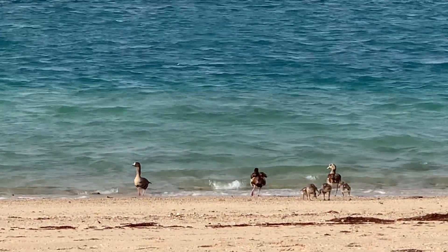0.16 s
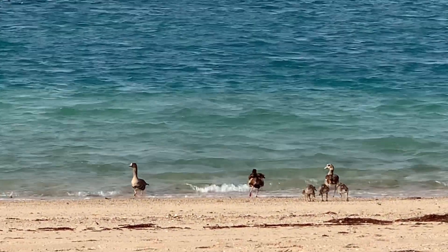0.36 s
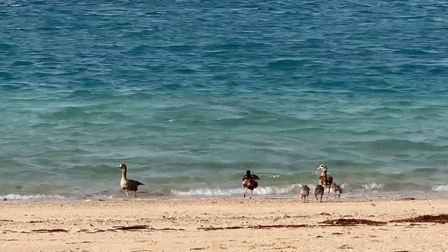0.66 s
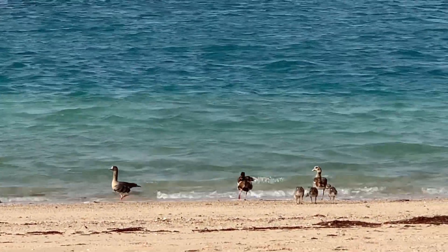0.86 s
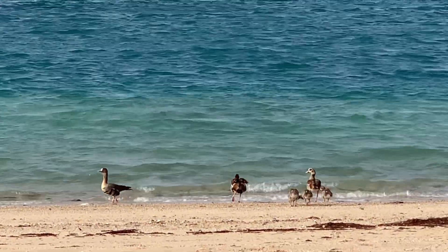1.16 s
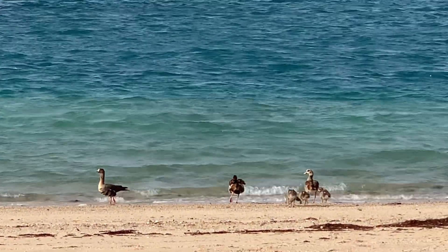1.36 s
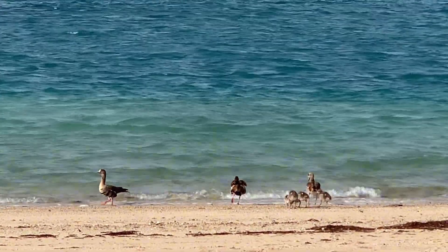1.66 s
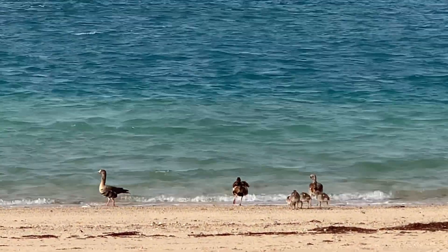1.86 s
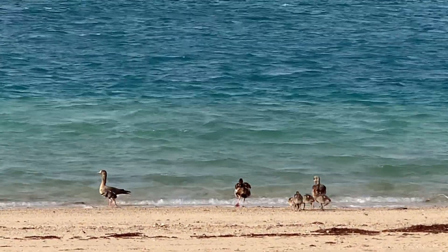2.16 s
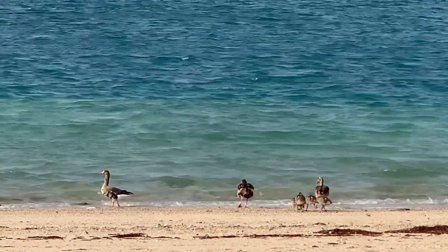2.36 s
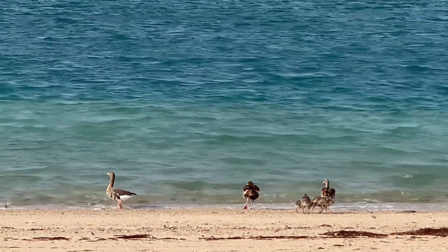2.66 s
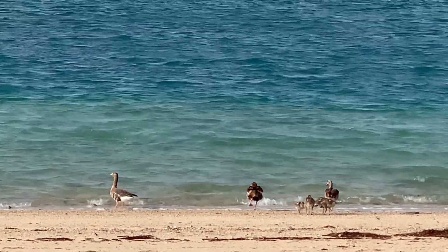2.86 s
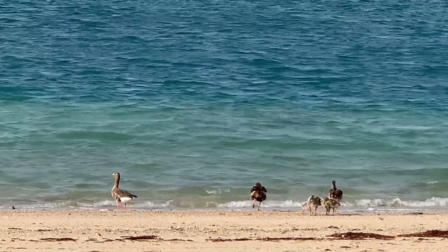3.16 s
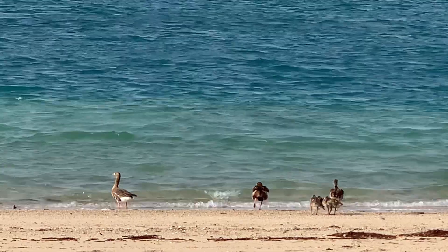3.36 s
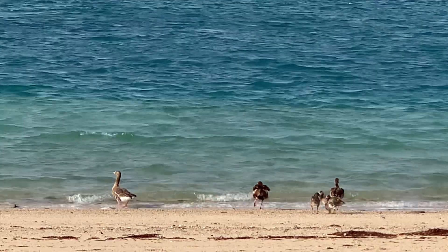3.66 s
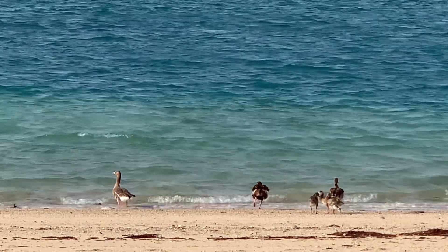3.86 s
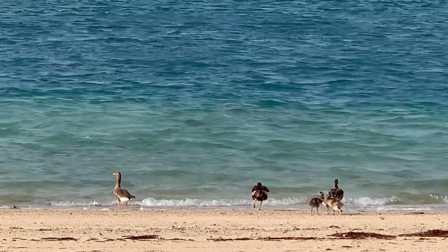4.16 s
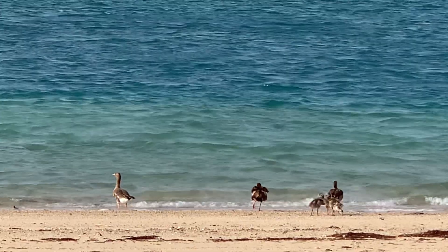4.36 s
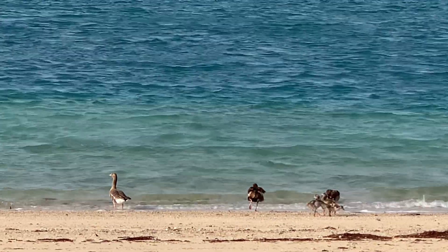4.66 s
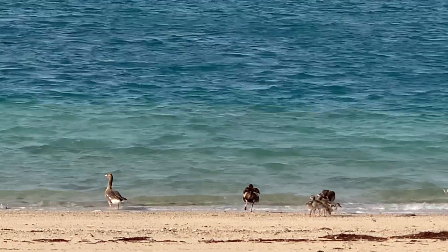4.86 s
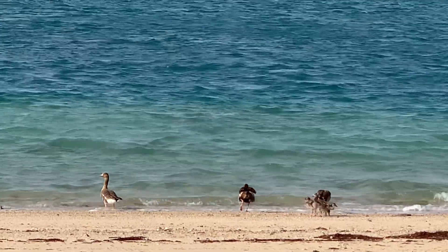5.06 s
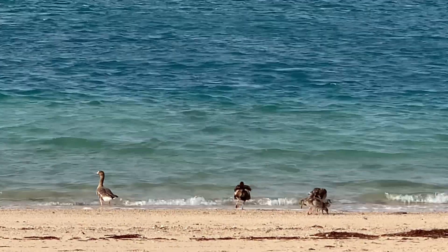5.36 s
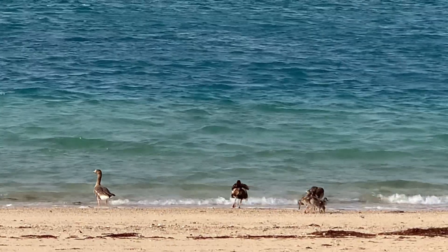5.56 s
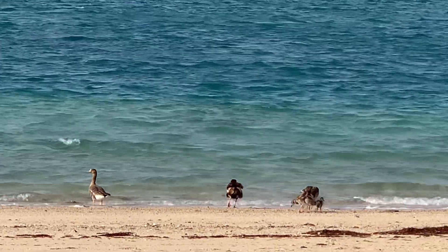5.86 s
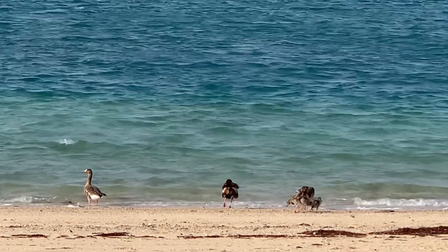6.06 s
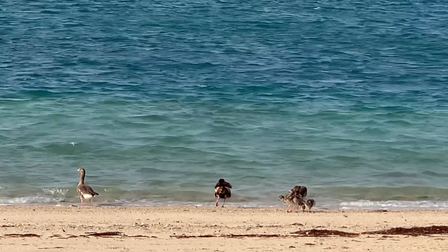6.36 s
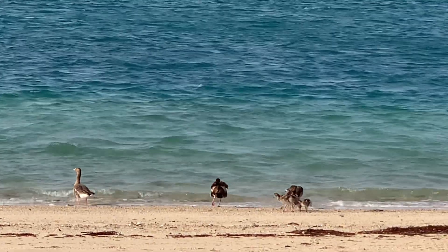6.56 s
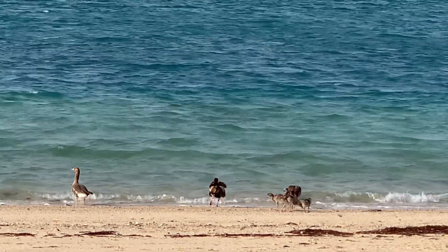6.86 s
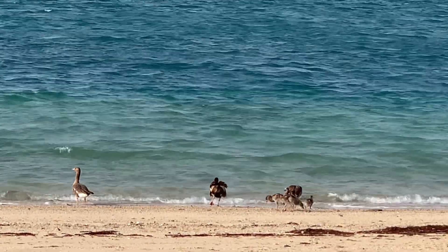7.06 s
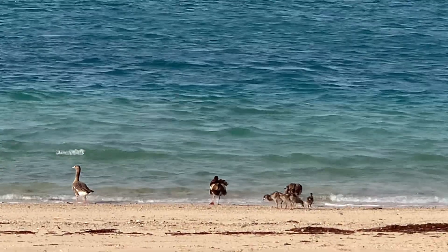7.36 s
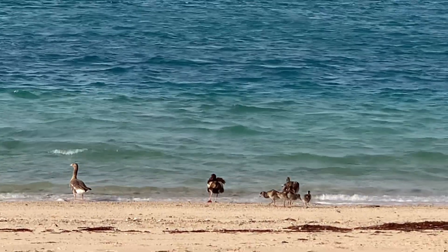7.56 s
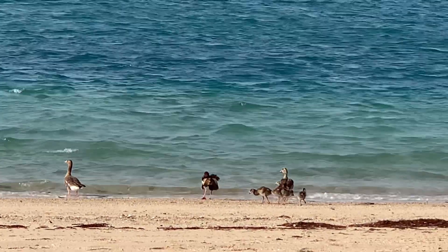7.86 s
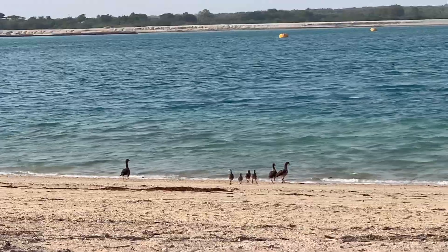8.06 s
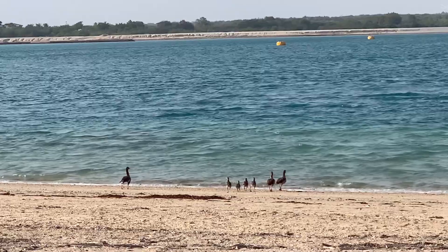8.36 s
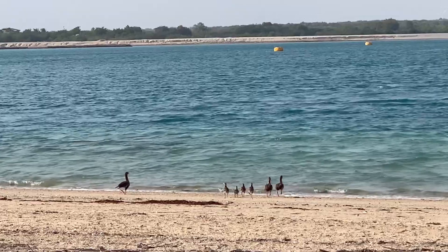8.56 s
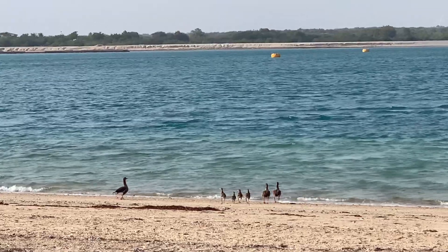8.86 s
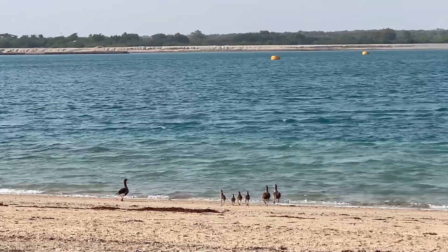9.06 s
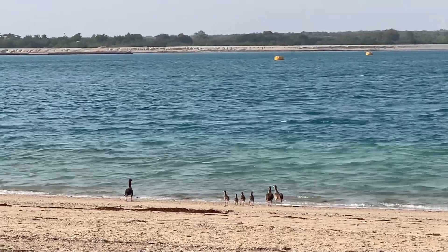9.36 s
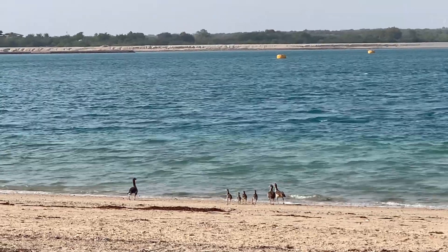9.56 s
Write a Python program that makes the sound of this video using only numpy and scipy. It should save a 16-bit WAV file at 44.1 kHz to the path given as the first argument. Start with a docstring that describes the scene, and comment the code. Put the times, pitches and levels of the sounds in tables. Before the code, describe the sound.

Gusty low wind rumble with faint gosling peeps and small waves; a distant motor drone builds for eight seconds, vanishes suddenly, and crackling wind remains.

```python
"""Wind buffets a two-port microphone on a beach: low noise swells with breeze and gusts, and gliding tones thump.
Out of sight a motor, probably a helicopter, nears for eight seconds: noise bands, hum partials and a whine swell.
Behind them small waves wash as shaped noise, wavelets hiss and goslings peep faintly in short harmonic tones.
At about 8 s a second scene cuts in: the motor is gone at once; fluttering, popping wind, peeps and a duller wash remain."""
import sys
import numpy as np
from scipy import signal
from scipy.fft import rfft, irfft, next_fast_len
from scipy.io import wavfile
from scipy.ndimage import uniform_filter1d, map_coordinates

SR = 44100
rng = np.random.default_rng(int(sys.argv[2]) if len(sys.argv) > 2 else 0)


def unload_wav(signal):
    """Save mono or channel-first audio to the path in sys.argv[1] as 16-bit WAV at rate SR, clipped to [-1, 1]."""
    wavfile.write(
        sys.argv[1],
        SR,
        np.round(np.clip(np.atleast_2d(signal).T, -1, 1) * 32767).astype(np.int16),
    )


N = 427769

# the cut to the second scene, and the click that follows it
CUT_S, CLICK_S = 7.986, 8.005

# WIND. All spectra below are relative: the shaped noise is levelled afterwards.
# the breeze between gusts, before the wind trim: (time [s], level [dB])
BREEZE = [(0, -23), (0.9, -24.5), (1.15, -21), (1.48, -27), (1.9, -25), (3.5, -25), (5.8, -21), (6.3, -22),
          (7.9, -21), (8.25, -26), (9.7, -26)]
# gusts on the microphone, before the wind trim: (start [s], length [s], level [dB])
GUSTS = [(0, 0.016, -15.5), (.39, 0.256, -25.5), (1.59, 0.15, -23), (1.72, 0.28, -23.5), (2.72, 0.1, -31),
         (3.23, 0.071, -20.5), (3.65, 0.56, -18.5), (4.26, 0.074, -19), (4.52, 0.056, -19),
         (4.58, 0.52, -18.5), (5.08, 0.52, -22.5), (6.48, 0.037, -20.5), (6.85, 0.055, -18),
         (7.17, 0.16, -23.5), (9.46, 0.076, -23)]
# a gust builds over a share of its length, so long gusts rise slowly
GUST_RISE_SHARE, GUST_FALL_S = 0.27, 0.028
# spectrum of the large eddies: (frequency [Hz], density [dB per Hz])
RUMBLE_SPECTRUM = [(15, -46), (28, -22.5), (45, -5), (65, 0.5), (100, -3), (150, -5), (220, -10),
                   (400, -16.5), (700, -28), (1200, -35), (3000, -82)]
# single eddies that thump: (time [s], peak level [dB], starting height above the end pitch [Hz], swell time [s])
THUMPS = [(0.104, -23, 420, 0.0074), (0.284, -20, 660, 0.005), (0.336, -17.5, 780, 0.0037),
          (0.364, -18, 550, 0.0066), (0.429, -17.5, 560, 0.0074), (0.468, -30, 800, 0.0054),
          (0.66, -14, 300, 0.012), (0.785, -17, 759, 0.0073), (0.84, -20.5, 606, 0.0051),
          (0.873, -13.5, 217, 0.011), (0.922, -11.5, 476, 0.012), (0.979, -11, 530, 0.014),
          (1.578, -10.5, 222, 0.014), (1.709, -21.5, 800, 0.0053), (2.76, -14, 597, 0.011),
          (3.828, -16, 665, 0.0064), (8, -15.5, 850, 0.0035), (8.051, -15, 764, 0.005),
          (8.075, -18, 1040, 0.0061), (8.119, -21, 950, 0.0038), (8.16, -18.5, 900, 0.0057),
          (8.207, -23, 865, 0.0038), (8.235, -23, 1200, 0.0025), (8.291, -20.5, 990, 0.0019),
          (8.347, -24.5, 960, 0.0033), (8.399, -23, 1000, 0.0046), (8.46, -21, 953, 0.0061),
          (8.596, -20.5, 1090, 0.0044), (8.678, -21.5, 1274, 0.0034), (8.745, -25, 1280, 0.0033),
          (8.887, -22, 1290, 0.0033), (8.948, -16.5, 1016, 0.0075), (9.001, -20, 1000, 0.0039),
          (9.082, -18.5, 1050, 0.0036), (9.132, -21.5, 1100, 0.0025), (9.288, -21.5, 1200, 0.0049),
          (9.324, -20, 1010, 0.0055), (9.374, -22, 1000, 0.0034), (9.418, -21, 1080, 0.0051),
          (9.565, -10.5, 258, .012)]
# flurries of small, fast eddies in the second scene: (start [s], length [s], flap level [dB], crackle level [dB])
FLURRIES = [(7.98, 0.2, -30.5, -52), (8.218, 0.048, -29, -37.5), (8.401, .03, -33, -39),
            (8.57, 0.125, -28, -39), (8.687, 0.14, -29, -38), (8.906, 0.07, -27.5, -34),
            (8.996, 0.23, -33, -42), (9.221, 0.11, -31, -39), (9.418, 0.048, -25.5, -35.5)]
FLURRY_RISE_SHARE, FLURRY_FALL_S = 0.11, 0.02
# spectrum of flapping air: (frequency [Hz], density [dB per Hz])
FLAP_SPECTRUM = [(80, -32), (200, 0), (350, 2.5), (600, 0), (900, -13), (1400, -43), (2500, -52.5),
                 (5000, -86)]
# spectrum of crackling air: (frequency [Hz], density [dB per Hz])
CRACKLE_SPECTRUM = [(400, -42), (900, 13.5), (1300, 8), (2000, -3.5), (2800, -21), (4500, -42),
                    (9000, -52.5), (15000, -59)]
# sharp pops where an eddy tears at a port, before trim and envelope: (time [s], level [dB])
POPS = [(8.234, -29), (8.262, -18.5), (8.292, -33), (8.348, -41), (8.426, -20.5), (8.4604, -22.5),
        (8.5962, -19.5), (8.636, -31), (8.704, -18.5), (8.745, -32), (8.779, -26), (8.8126, -18.5),
        (8.9172, -24), (8.949, -22), (8.964, -26), (9.083, -20.5), (9.134, -30), (9.24, -26.5),
        (9.288, -19.5), (9.301, -18), (9.325, -26), (9.4763, -14), (9.511, -21)]
# spectrum of a pop: (frequency [Hz], density [dB per Hz])
POP_SPECTRUM = [(300, -20.5), (900, 9.5), (1500, 14), (2400, -7.5), (3500, -27.5), (5000, -34),
                (10000, -56)]
# how much crackles and pops differ between the ports: (frequency [Hz], side over mid [dB])
CRACKLE_APART = [(1000, -5.5), (1500, -5.5), (2200, -4.5), (2900, 6), (4000, 3), (8000, 0)]

# MOTOR
# its approach: (time [s], loudness [dB], treble hiss before trim [dB])
APPROACH = [(0.1, -54, -63.5), (0.16, -51, -64.5), (1.29, -44.5, -55.5), (1.82, -48, -60),
            (2.57, -43, -55.5), (2.92, -39.5, -55), (4.14, -38, -52.5), (4.51, -36.5, -54.5),
            (4.62, -36.5, -53), (5.86, -33, -48.5), (6.25, -32.5, -48.5), (6.85, -30.5, -48),
            (7.42, -29.5, -45), (7.9, -29, -43.5)]
CLOSE_DB = -29  # loudness at the closest
# how each voice grows with loudness: (level at the closest [dB], gain per dB of loudness [dB])
ROAR_LAW = (-19, 1.71)
RUSH_LAW = (-23.5, 1.26)
DRONE_LAW = (-27, 1)
WHINE_LAW = (-38.5, 4.8)
# spectrum of the roar: (frequency [Hz], density [dB per Hz])
ROAR_SPECTRUM = [(60, -29), (180, -9.5), (250, -0.5), (320, 2.5), (400, -1.5), (550, -5), (670, -3.5),
                 (850, -9), (1300, -28), (3000, -49.5)]
# spectrum of the rush from afar, then from near by: (frequency [Hz], density [dB per Hz])
RUSH_FAR = [(400, -24), (800, -4), (1200, 4), (1500, 1), (1750, -10.5), (2100, -12.5), (2400, -16),
            (2850, -8.5), (3450, -13), (3800, -17.5), (4300, -18), (5000, -47), (8000, -58)]
RUSH_NEAR = [(400, -4.5), (800, 2.5), (1150, 0), (1500, 3), (1850, -2), (2150, -6), (2500, -8), (2700, -13),
             (3200, -7), (3750, -11), (4400, -17.5), (5000, -16), (6000, -28.5), (8000, -41.5),
             (15000, -34)]
# spectrum of the treble hiss: (frequency [Hz], density [dB per Hz])
HISS_SPECTRUM = [(2500, 1), (4200, 7), (5200, 0.5), (6000, 0.5), (7000, -4), (8600, 5), (10500, -1),
                 (12000, -28), (15000, -22)]
# pitch of the drone, base of the hum: (time [s], pitch [Hz])
MOTOR_PITCH = [(0, 254.5), (1.25, 265.2), (2.7, 280.5), (3.3, 294.5), (4.5, 297.2), (8, 298.3)]
# hum partials before trim: (multiple of the pitch, level from afar [dB], level near by [dB])
HUM_PARTIALS = [(2, -6.5, -10), (3, -1.5, 1), (4, 1.5, 0.5), (5, -6, -2), (6, -25, -2), (8, -29, -15)]
# the air carries the drone over in swells: (start [s], length [s], level [dB])
DRONE_SWELLS = [(1.0, 0.38, -32), (1.75, 1.18, -31), (5.8, 1.54, -28)]
WHINE_HZ = 3962
# bands in the rush: (centre afar [Hz], centre near by [Hz], noise rate [knots per s],
# level at the closest [dB], gain per dB of loudness [dB])
RUSH_BANDS = [(1230, 900, 110, -36.5, 1.05), (2069, 2370, 290, -33.5, 2.5), (2840, 2900, 200, -50, 1),
              (3620, 3900, 420, -42, 6)]
# whistles as it gathers speed: (start [s], length [s], from [Hz], to [Hz], level [dB])
WHISTLES = [(1.14, 0.1, 2195, 2205, -50), (1.35, .22, 2210, 2225, -53), (1.0, .55, 2720, 2780, -56),
            (1.0, .45, 3930, 3980, -59), (2.15, 1.0, 4090, 4230, -62), (2.15, .13, 4605, 4630, -59.5)]
AIR_DB = 0.45  # how far moving air makes roar and rush wander
# the motor at the two ports, from afar, then near by: (frequency [Hz], lead of the left port [rad])
PHASE_FAR = [(500, -1), (900, -2), (1600, -2), (2200, -2), (2500, -7.5), (2850, -6), (3300, -2),
             (4200, -2.5), (5000, -7.5), (5500, -11.5), (6400, -6), (7100, -10.5), (10500, -14),
             (12500, -39.5), (15000, -8.5)]
PHASE_NEAR = [(100, 3.5), (300, 0.8), (1000, -2.5), (1950, -2.5), (2200, 0.7), (2450, 2.5), (2850, 7.5),
              (3200, 8.5), (3700, 11), (5000, 7.5), (6400, 7.5), (7100, 2), (8600, 1.24), (10500, 1),
              (12500, 13.5)]
# likeness of distant noise at the two ports: (frequency [Hz], correlation)
PORT_ALIKE = [(150, .45), (600, .6), (1300, .9), (2100, .7), (4000, .8), (9000, .85)]
# level difference of sided sounds: (frequency [Hz], left over right [dB])
PORT_TILT = [(400, 0), (700, 0), (1300, -1), (2400, -0.5), (4400, -6), (8000, 0)]

# BEACH
# gosling peeps: (start [s], length [s], base pitch mid-peep [Hz], level [dB], third partial [dB])
PEEPS = [(0.2, .055, 1086, -47, -16), (1.288, .072, 1102, -44, -5), (2.386, 0.048, 1088, -39.5, -19),
         (2.438, 0.055, 1090, -40, -9), (8.402, .19, 1184, -58.5, -14), (8.9, .18, 1188, -58, -16)]
# the other partials of a peep: (multiple of the base pitch, level [dB])
PEEP_PARTIALS = [(4, -8), (5, -24), (8, -13)]
# wavelets breaking on the sand: (start [s], length [s], centre [Hz], level before graining [dB])
SPLASHES = [(.26, .035, 1300, -43), (.56, .09, 1450, -45), (0.614, 0.022, 4600, -50),
            (1.16, .05, 1500, -43), (1.951, 0.046, 1280, -36.5)]
# wash of the waves close by, then in the second scene: (frequency [Hz], density [dB per Hz])
CLOSE_WASH = [(200, -12), (700, -1), (1200, 4.5), (2000, 2), (2800, -4), (4200, -6), (5500, -14.5),
              (8500, -20), (10500, -43), (12000, -55)]
FAR_WASH = [(300, -5), (1200, 3.5), (2500, -11), (4500, -15), (7000, -27), (9000, -16), (12000, -40)]

# MICROPHONE: mono bass (highest corner, treble level that halves it, slopes) and band limit
MONO_TOP_HZ, MONO_HALVED_DB = 1014, -41
MONO_SLOPE, MONO_STEEPNESS = 1.8, 32
TOP_HZ = 15400


def buffeting(lump_db=2, steady=0.67, unrest_db=1, wind_db=0.9, apart=0.35):
    """Large eddies press on both ports almost alike; breeze and gusts set their strength."""
    gust_power = swells(GUSTS, GUST_RISE_SHARE, GUST_FALL_S)
    strength = np.sqrt(amp(curves(BREEZE)[0]) ** 2 + gust_power)
    lumpy_noise = rng.standard_normal((2, N)) * amp(lump_db * wobble(45))
    swirl = coloured(lumpy_noise, RUMBLE_SPECTRUM)
    # partly even out the noise's own swells
    own_swell = np.sqrt(np.abs(uniform_filter1d(swirl ** 2, size=4000)) + 1e-6)
    evened = unit(swirl / own_swell ** steady)
    mid, side = strength * amp(wind_db + unrest_db * wobble(15)) * evened
    return np.array([mid + apart * side, mid - apart * side])


def thumps(end_hz=65, fall_s=0.00568, ragged=0.221, puff_db=-16):
    """An eddy hits with a puff of noise while a ragged tone swells and glides down into the bass."""
    body, puff = np.zeros(N), np.zeros(N)
    t = np.arange(SR // 8) / SR
    for start, db, drop_hz, swell_s in THUMPS:
        unrest = unit(uniform_filter1d(rng.standard_normal(len(t)), size=80))
        pitch = (end_hz + drop_hz * np.exp(-t / fall_s)) * np.exp(ragged * unrest)
        shape = (t / swell_s * np.exp(1 - t / swell_s)) ** 1.84
        add(body, start, -amp(db) * shape * np.sin(turning(pitch)))
        add(puff, start, amp(db + puff_db) * shape * np.exp(-t / fall_s))
    return body + puff * coloured(rng.standard_normal(N), FLAP_SPECTRUM)


def flutter(calm=0.69, lull_flap_db=-34, lull_crackle_db=-47):
    """Small eddies flap at the ports and tear into crackles, strongest in each flurry of the second scene."""
    def strength(events, lull_db):
        return np.sqrt(amp(lull_db) ** 2 + swells(events, FLURRY_RISE_SHARE, FLURRY_FALL_S))

    stream = calm + eddies(rate=105, life_s=0.0045)
    flap = coloured(rng.standard_normal(N) * stream, FLAP_SPECTRUM)
    grains = rng.standard_normal((2, N)) * stream * eddies(rate=600, life_s=0.001)
    crackle = split_ports(*coloured(grains, CRACKLE_SPECTRUM))
    flap_events = [(start, length, flap_db) for start, length, flap_db, _ in FLURRIES]
    crackle_events = [(start, length, crackle_db) for start, length, _, crackle_db in FLURRIES]
    flap = flap * strength(flap_events, lull_flap_db)
    crackle = crackle * strength(crackle_events, lull_crackle_db)
    return (flap + crackle) * (1 - first_scene())


def pops(life_s=0.0021, rise_s=0.00045, pop_db=-3.5):
    """Each pop is a few milliseconds of turbulence, partly different at each port."""
    envelope = np.zeros(N)
    t = np.arange(SR // 30) / SR
    for start, db in POPS:
        add(envelope, start, amp(db + pop_db) * np.exp(-t / life_s) * (1 - np.exp(-t / rise_s)))
    return split_ports(*(envelope * coloured(rng.standard_normal((2, N)), POP_SPECTRUM)))


def eddies(rate, life_s):
    """Strength of a stream of eddies (rate per second), each with a sharp front and quick decay; rms 1."""
    fronts = (rng.random(N) < rate / SR) * (1.0 + rng.random(N))
    power = signal.lfilter([1], [1, -np.exp(-1 / (life_s * SR))], fronts ** 2)
    return unit(np.sqrt(np.abs(power)))


def split_ports(mid, side):
    """The finest turbulence differs most from port to port."""
    side = filtered(side, lambda hz: amp(along(CRACKLE_APART, hz)))
    return np.array([mid + side, mid - side])


def motor(turn_from_s=5.82, turn_until_s=7.59, hiss_db=6):
    """Roar, rush and hiss swell as it nears; its colour and direction shift over the last seconds."""
    treble_db = curves(APPROACH)[1]
    near = np.interp(np.arange(N) / SR, [turn_from_s, turn_until_s], [0, 1])
    air = AIR_DB * wobble(8.2)
    tones = motor_tones(near) + motor_bands() + whistles()
    sound = np.zeros((2, N))
    for share, rush, phase in (1 - near, RUSH_FAR, PHASE_FAR), (near, RUSH_NEAR, PHASE_NEAR):
        noise = amp(motor_level(ROAR_LAW) + air) * distant_noise(ROAR_SPECTRUM, patchy_db=2.5)
        noise += amp(motor_level(RUSH_LAW) + air) * distant_noise(rush, patchy_db=2.0)
        noise += amp(treble_db + hiss_db + 0.92 * wobble(8.9)) * distant_noise(HISS_SPECTRUM, patchy_db=2.0)
        # noise crossfades by power, tones by amplitude
        sound += at_ports(np.sqrt(share) * noise + share * tones, phase)
    return sound * first_scene()


def motor_tones(near, hum_db=-6.5, waver=0.00361, fade_db=3, smear=0.72):
    """A drone that roughens as it nears, the hum's partials and the turbine whine, fading in and out with the air."""
    pitch, = curves(MOTOR_PITCH)
    turn = turning(pitch * (1 + waver * wobble(25)))
    smooth = 1.23 * amp(1.2 * wobble(16)) * np.sin(turn + 0.97 * wobble(34))
    rough = narrow_noise(pitch, rate=69)
    drone_swell = swells(DRONE_SWELLS, rise_share=0.12, fall_s=0.45)
    carried = np.sqrt(amp(motor_level(DRONE_LAW)) ** 2 + drone_swell)
    drone = carried * (np.sqrt(1 - near) * smooth + np.sqrt(near) * rough)
    hum = np.zeros(N)
    for multiple, far_db, near_db in HUM_PARTIALS:
        level_db = far_db + (near_db - far_db) * near + fade_db * wobble(9)
        hum += amp(level_db) * np.sin(multiple * turn + smear * wobble(70))
    whine_level = amp(motor_level(WHINE_LAW) + fade_db * wobble(5.1))
    whine = whine_level * np.sin(turning(WHINE_HZ + 22 * wobble(120)))
    return drone + amp(motor_level(RUSH_LAW) + hum_db) * hum + whine


def motor_bands(slide_from_s=6.5, slide_until_s=7.9):
    """Narrow noise bands in the rush grow with loudness; the lowest slides down and the others up at the end."""
    slide = np.interp(np.arange(N) / SR, [slide_from_s, slide_until_s], [0, 1])
    bands = np.zeros(N)
    for far_hz, near_hz, rate, db, growth in RUSH_BANDS:
        centre = far_hz + (near_hz - far_hz) * slide
        bands += amp(motor_level((db, growth))) * narrow_noise(centre, rate)
    return bands


def whistles():
    """Thin, breathy whistles of narrow noise glide up while the motor gathers speed."""
    sound = np.zeros(N)
    for start, length, from_hz, to_hz, db in WHISTLES:
        glide = curves([(start, from_hz), (start + length, to_hz)])[0]
        loudness = np.sqrt(swells([(start, length, db)], rise_share=0.13, fall_s=0.1))
        sound += loudness * narrow_noise(glide, rate=45)
    return sound


def motor_level(law):
    """Level in dB of one voice of the motor as it approaches."""
    close_db, growth = law
    return close_db + growth * (curves(APPROACH)[0] - CLOSE_DB)


def distant_noise(spectrum, patchy_db):
    """Stereo noise of rms 1 that fades in patches on its way through moving air."""
    grid = signal.stft(rng.standard_normal((2, N)), nperseg=512)[2]
    patches = uniform_filter1d(rng.standard_normal(grid.shape[1:]), size=5, axis=0)  # across frequency
    patches = uniform_filter1d(patches, size=16, axis=1)  # across time
    pair = signal.istft(grid * amp(patchy_db * unit(patches)), nperseg=512)[1][:, :N]

    def mid_side(hz):
        angle = np.arccos(np.clip(along(PORT_ALIKE, hz), 0, 1)) / 2
        return amp(along(spectrum, hz)) * np.array([np.cos(angle), np.sin(angle)])

    mid, side = filtered(pair, mid_side)
    return unit(np.array([mid + side, mid - side]))


def narrow_noise(hz, rate):
    """A band of noise around a centre that may move, wider at a higher rate of knots; rms 1."""
    turn = turning(hz)
    return unit(wobble(rate) * np.sin(turn) + wobble(rate) * np.cos(turn))


def at_ports(sound, phase):
    """Sound from one side reaches the ports with a phase offset, and louder right in parts of the treble."""
    def both(hz):
        left = amp(along(PORT_TILT, hz) / 2) * np.exp(0.5j * along(phase, hz))
        return np.array([left, 1 / left])

    return filtered(sound, both)


def goslings(lead=2.2):
    """Each thin peep, all upper partials, rises quickly, holds with a quaver and drops further than it rose."""
    droop, late_drop, quaver, shake_db = 0.07, 0.45, 0.003, 1.8
    track = np.zeros(N)
    for start, length, hz, db, third_db in PEEPS:
        u = np.linspace(-1, 1, int(length * SR))  # from start to end of the peep
        bend = droop * u ** 4 * (1 + late_drop * u)
        turn = turning(hz * (1 - bend + quaver * wobble(90)[:len(u)]))
        loudness = amp(db + shake_db * wobble(90)[:len(u)]) * np.sqrt(1 - u ** 2)
        partials = [(3, third_db)] + list(PEEP_PARTIALS)
        add(track, start, loudness * sum(amp(level) * np.sin(k * turn) for k, level in partials))
    return at_ports(track, [(1000, lead)])  # the left port leads by the same angle [rad] everywhere


def splashes(octaves=0.39, rise_share=0.44, fall_s=0.02):
    """Each breaking wavelet is a short, grainy hiss around its own pitch."""
    track = np.zeros((2, N))
    for start, length, centre_hz, db in SPLASHES:
        band = lambda hz: np.exp(-0.5 * (np.log2((hz + 1) / centre_hz) / octaves) ** 2)
        hiss = unit(filtered(rng.standard_normal((2, N)), band))
        track += np.sqrt(swells([(start, length, db)], rise_share, fall_s)) * hiss
    return track * unit(amp(2.5 * wobble(300)))


def waves(close_db=-44, far_db=-56):
    """Small waves wash the sand as gently wandering noise, fainter and duller in the second scene."""
    def wash(spectrum):
        grains = rng.standard_normal((2, N)) * amp(1.4 * wobble(200))
        return amp(wobble(2.41)) * coloured(grains, spectrum)

    close = amp(close_db) * wash(CLOSE_WASH) * first_scene()
    return close + amp(far_db) * wash(FAR_WASH) * (1 - first_scene())


def splice(click_db=-17, life_s=0.00013):
    """The join between the two scenes leaves one small click."""
    track, t = np.zeros(N), np.arange(SR // 100) / SR
    add(track, CLICK_S, amp(click_db) * np.exp(-t / life_s))
    return track


def first_scene():
    """1 in the first scene, then 0, with a 5.5 ms crossfade."""
    return np.clip((CUT_S - np.arange(N) / SR) / 0.0055 + 0.5, 0, 1)


def swells(rows, rise_share, fall_s):
    """Summed power of (start [s], length [s], level [dB]) events that rise, hold and die away."""
    power = np.zeros(N)
    for start, length, db in rows:
        t = np.arange(int((length + 6 * fall_s) * SR)) / SR
        rise = np.minimum(t / (rise_share * length), 1)
        fall = np.exp(-np.maximum(t - length, 0) / fall_s)
        add(power, start, (amp(db) * rise * fall) ** 2)
    return power


def amp(db):
    """Decibels to gain."""
    return 10 ** (np.asarray(db) / 20)


def unit(x):
    """Scale to rms 1."""
    return x / np.sqrt(np.mean(x ** 2) + 1e-20)


def turning(hz):
    """Running phase in radians of a pitch given per sample."""
    return 2 * np.pi * np.cumsum(hz) / SR


def along(points, hz):
    """Read (frequency [Hz], value) points on a log frequency axis."""
    f, v = np.transpose(points)
    return np.interp(np.log(hz + 1), np.log(f + 1), v)


def curves(rows):
    """One value per sample for each column after the time."""
    times, *columns = np.transpose(rows)
    return [np.interp(np.arange(N) / SR, times, column) for column in columns]


def wobble(rate):
    """A smooth random curve, rate knots a second."""
    knots = rng.standard_normal(int(N * rate / SR) + 4)
    return map_coordinates(knots, [np.arange(N) * rate / SR])


def filtered(x, response):
    """Apply a complex response of frequency to x."""
    size = next_fast_len(N + SR // 2)
    return irfft(rfft(x, size) * response(np.fft.rfftfreq(size, 1 / SR)), size)[..., :N]


def coloured(x, spectrum):
    """Shape x by a spectrum, at rms 1."""
    return unit(filtered(x, lambda hz: amp(along(spectrum, hz))))


def add(track, start, sound):
    """Mix a sound into a track at a start time in seconds."""
    part = track[max(round(start * SR), 0):][:len(sound)]
    part += sound[:len(part)]


def scene():
    """Wind on the ports over the motor and the sounds of the beach."""
    wind = buffeting() + thumps() + flutter() + pops()
    return wind + motor() + goslings() + splashes() + waves() + splice()


def record(dry):
    """The microphone folds the bass to mono, less far up the more treble it hears, and cuts above its band limit."""
    mid, side = (dry[0] + dry[1]) / 2, (dry[0] - dry[1]) / 2
    hz, times, grid = signal.stft(side, SR, nperseg=2048)
    power = np.mean(filtered(dry, lambda f: f > 2000) ** 2, axis=0)
    treble = np.sqrt(np.abs(uniform_filter1d(power, size=4000)))
    treble = np.interp(times, np.arange(N) / SR, treble)
    corner_hz = MONO_TOP_HZ / (1 + (treble / amp(MONO_HALVED_DB)) ** MONO_SLOPE)
    side_gain = 1 / np.sqrt(1 + (corner_hz / (hz[:, None] + 1)) ** MONO_STEEPNESS)
    side = signal.istft(grid * side_gain, SR, nperseg=2048)[1][:N]
    return filtered(np.array([mid + side, mid - side]), lambda f: f < TOP_HZ)


dry = scene()
out = record(dry)
unload_wav(out)
```